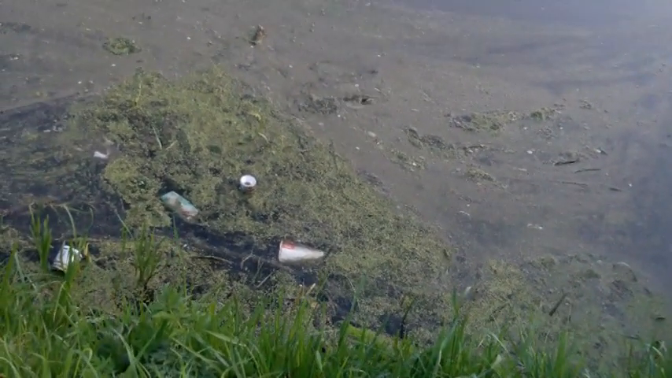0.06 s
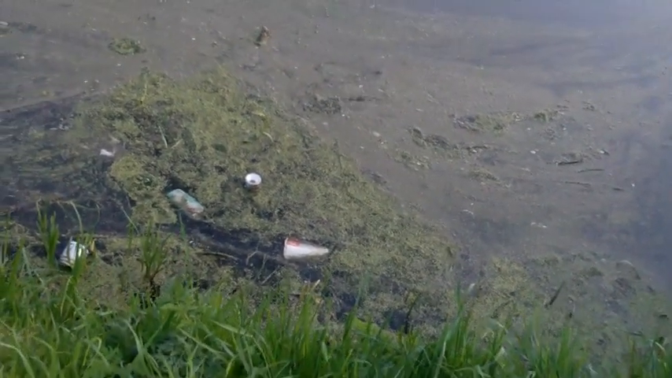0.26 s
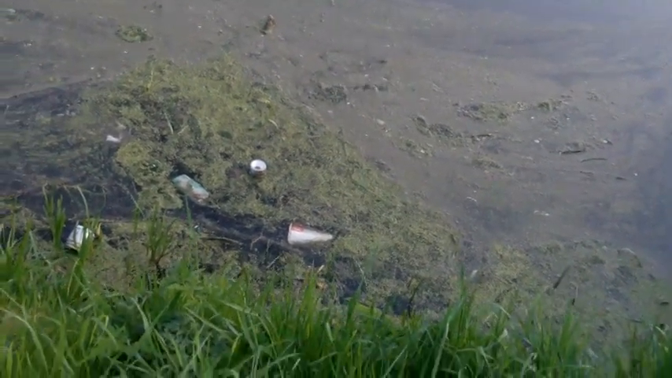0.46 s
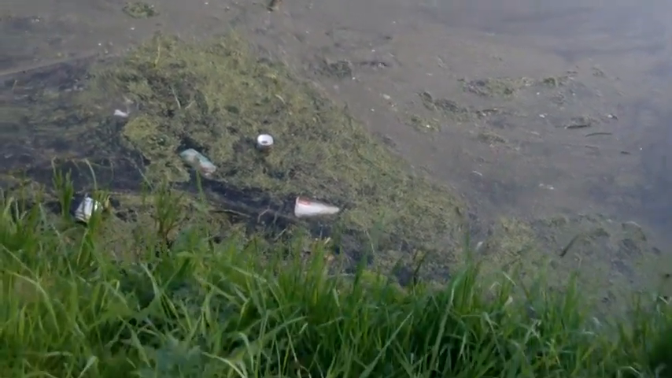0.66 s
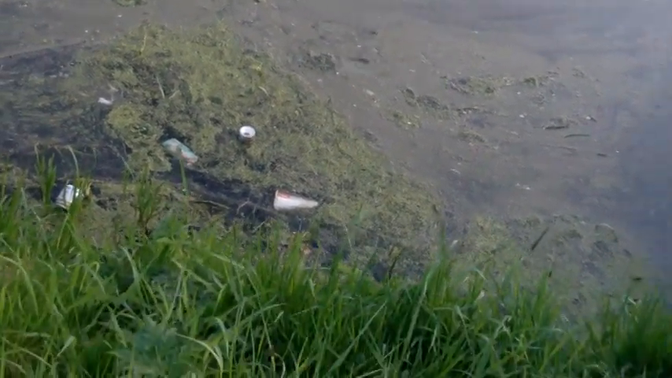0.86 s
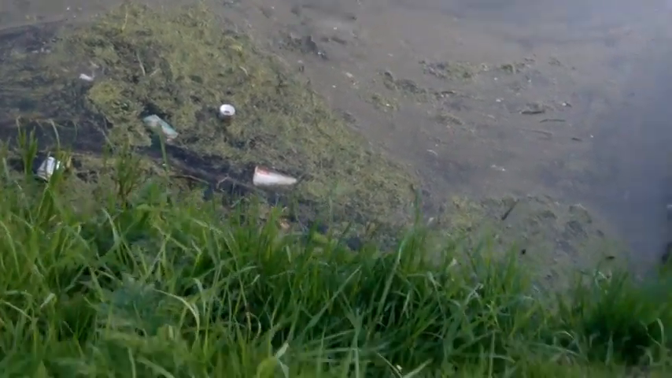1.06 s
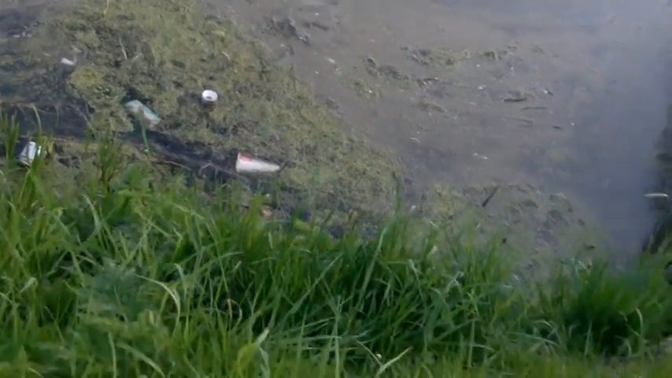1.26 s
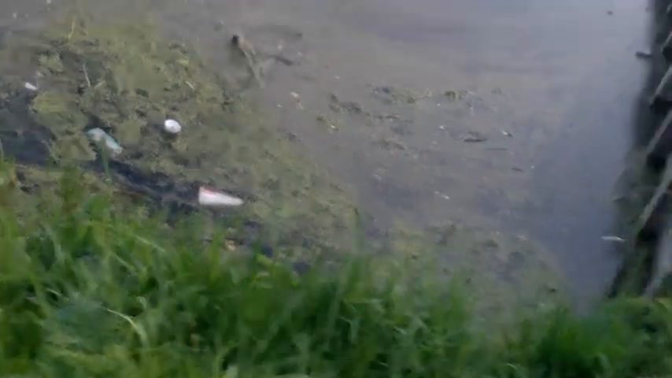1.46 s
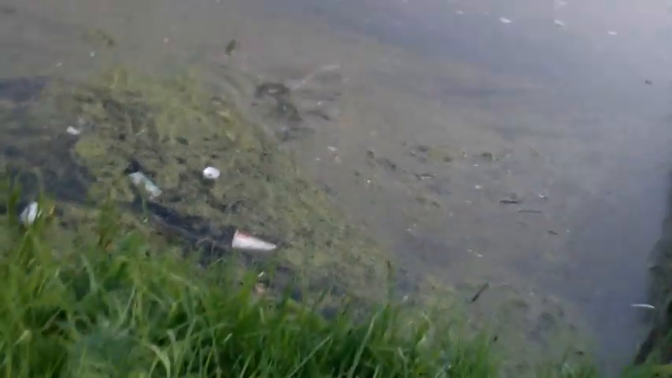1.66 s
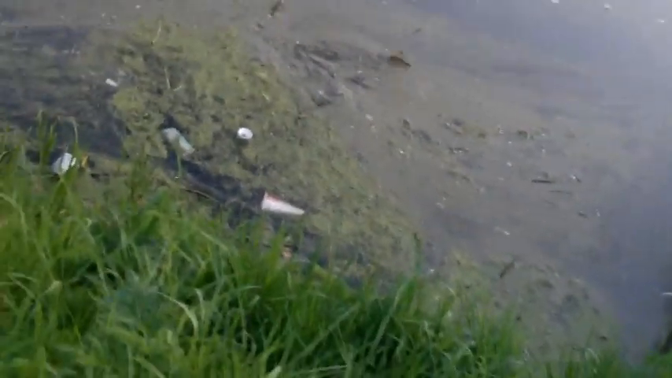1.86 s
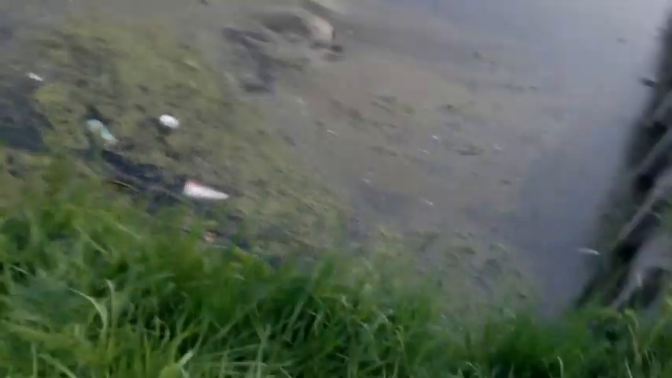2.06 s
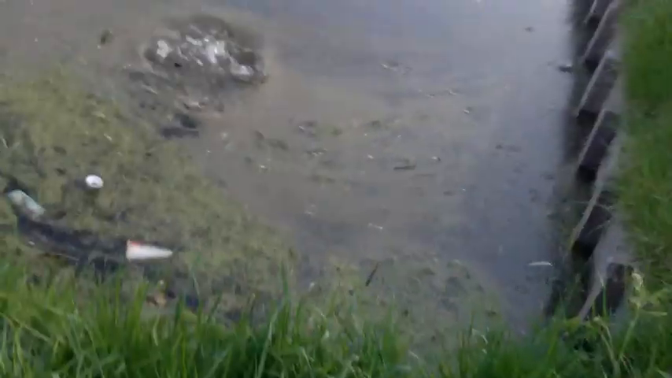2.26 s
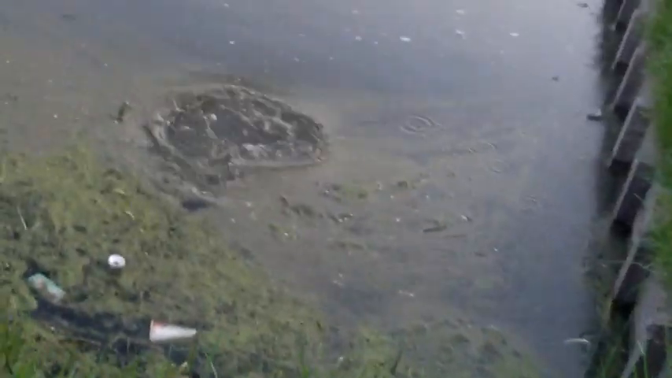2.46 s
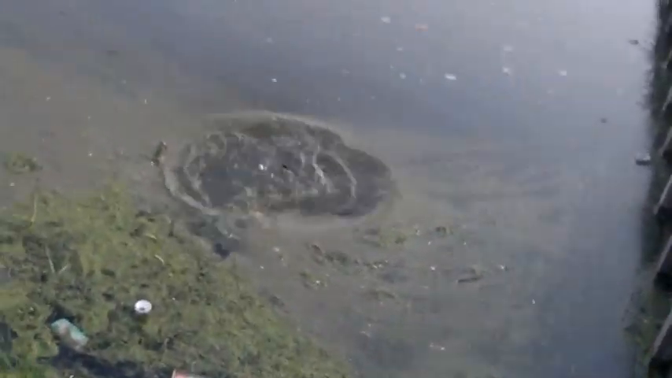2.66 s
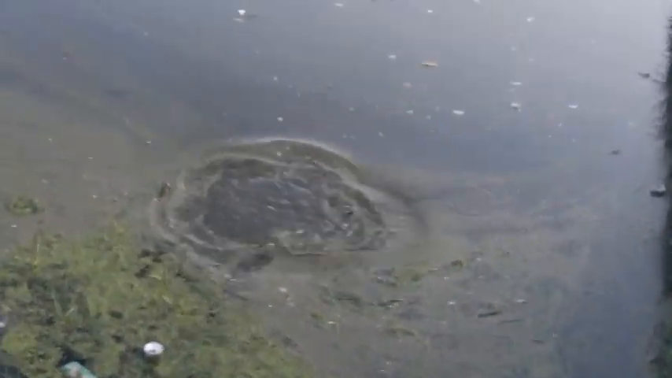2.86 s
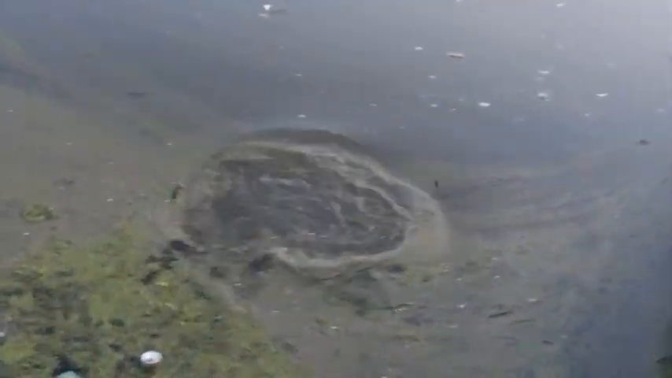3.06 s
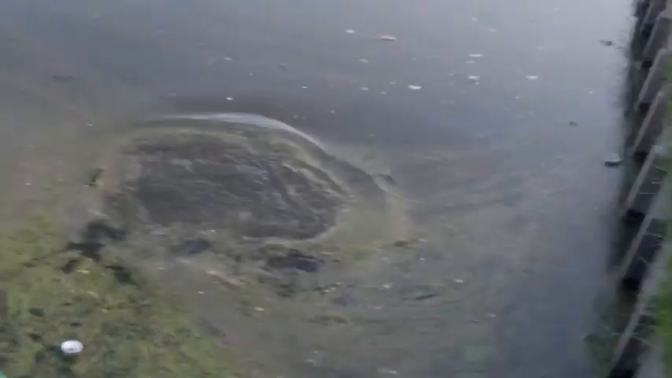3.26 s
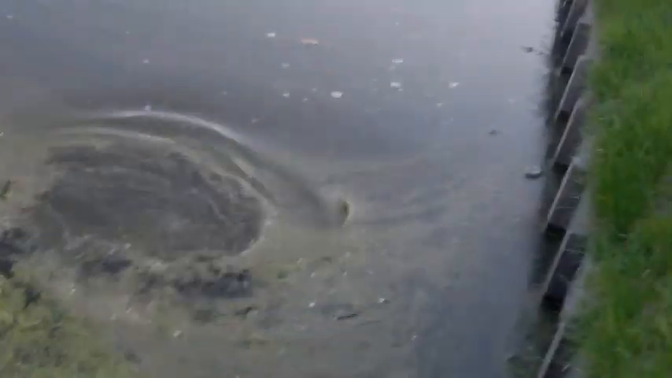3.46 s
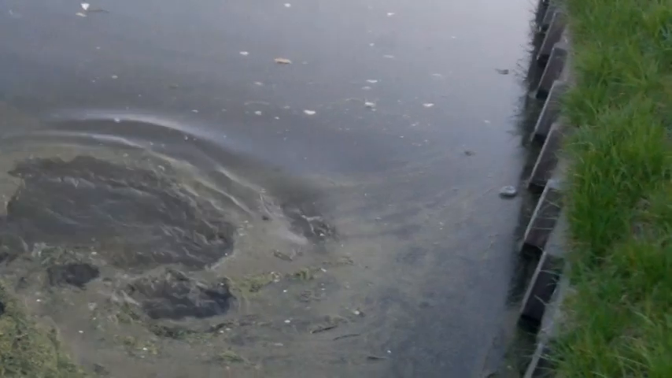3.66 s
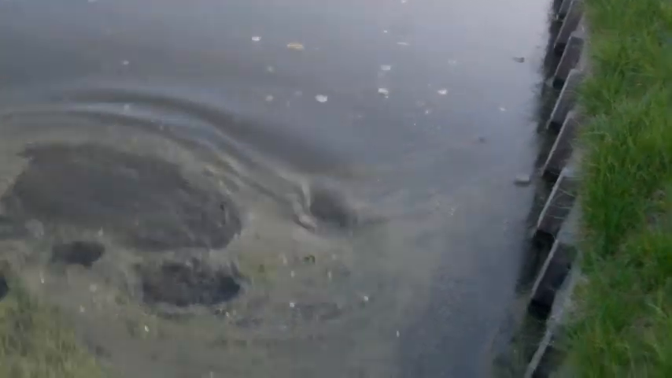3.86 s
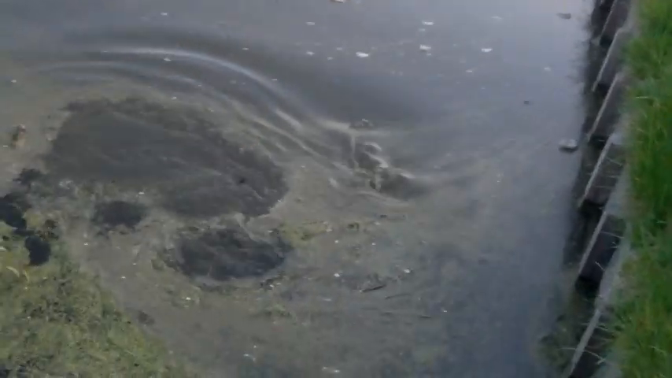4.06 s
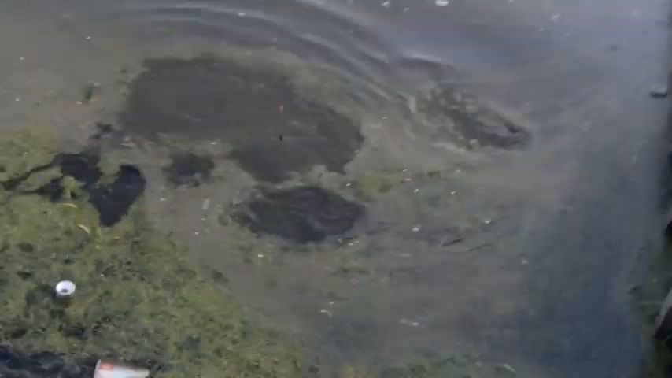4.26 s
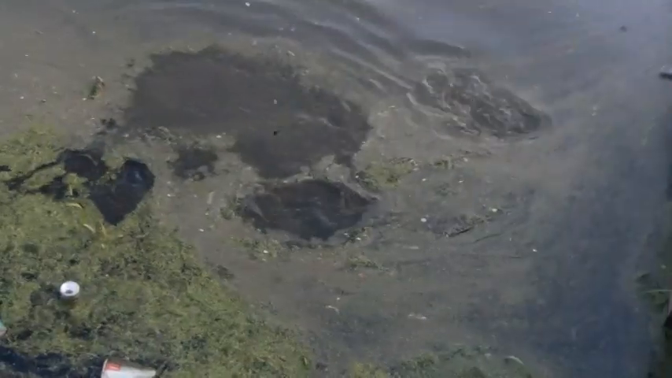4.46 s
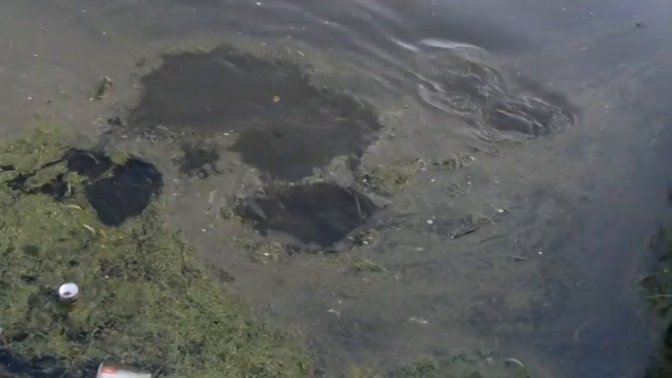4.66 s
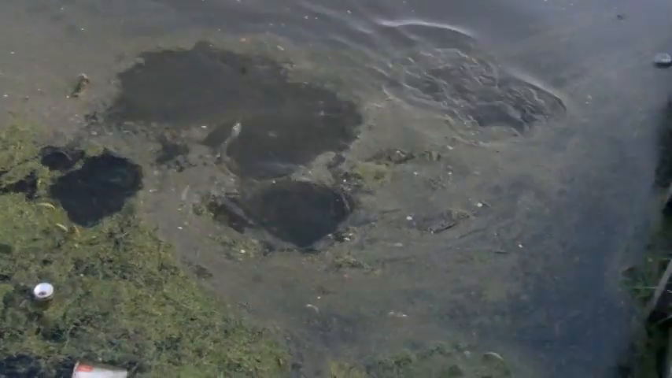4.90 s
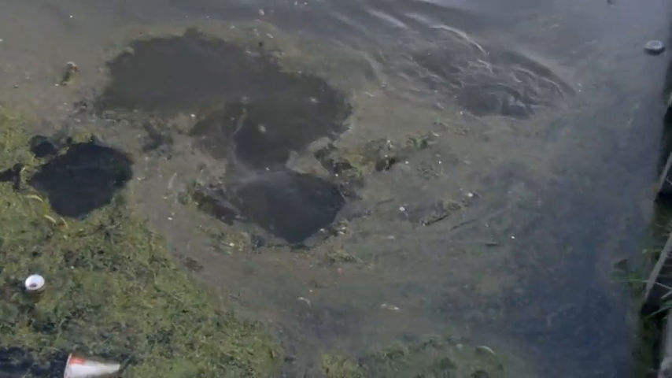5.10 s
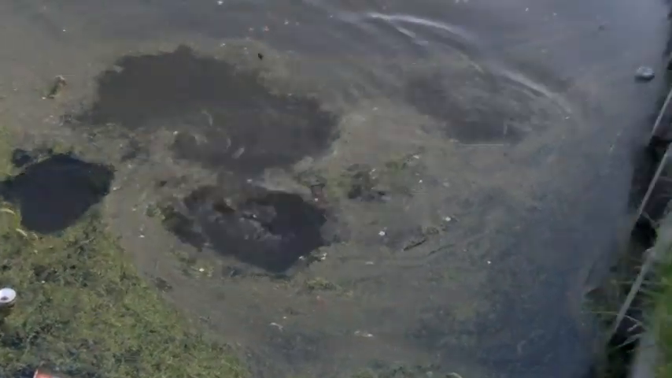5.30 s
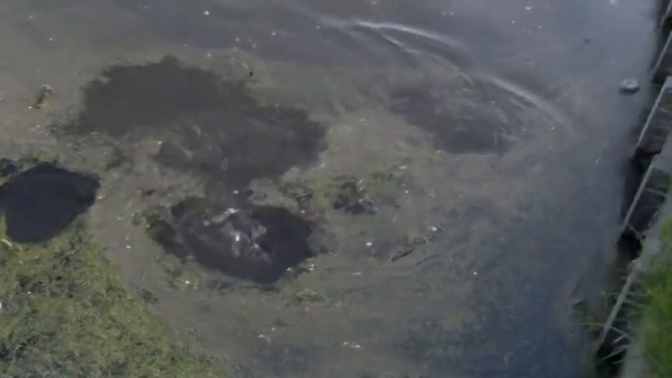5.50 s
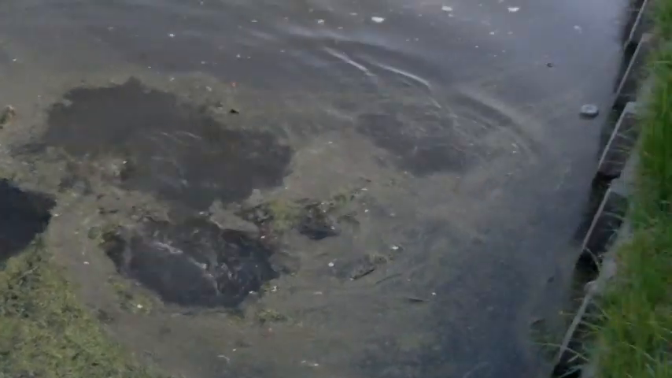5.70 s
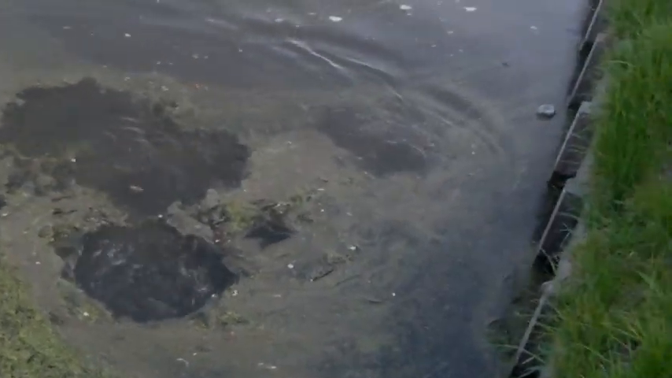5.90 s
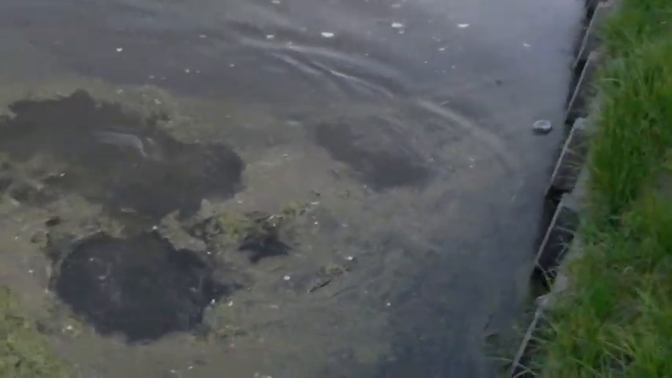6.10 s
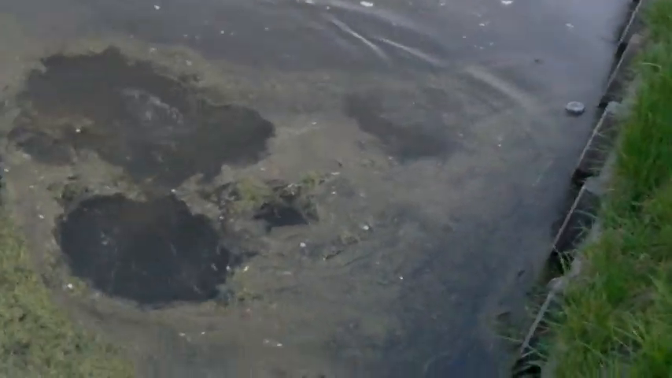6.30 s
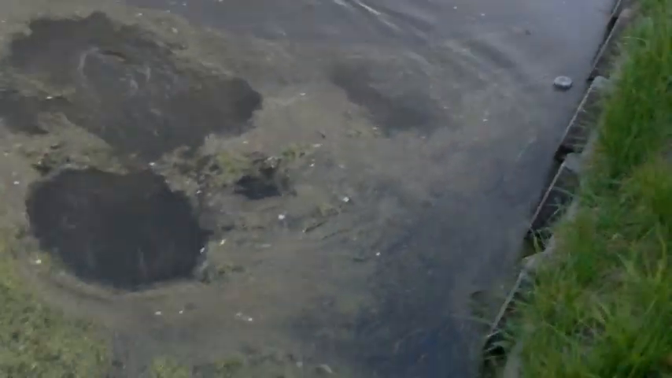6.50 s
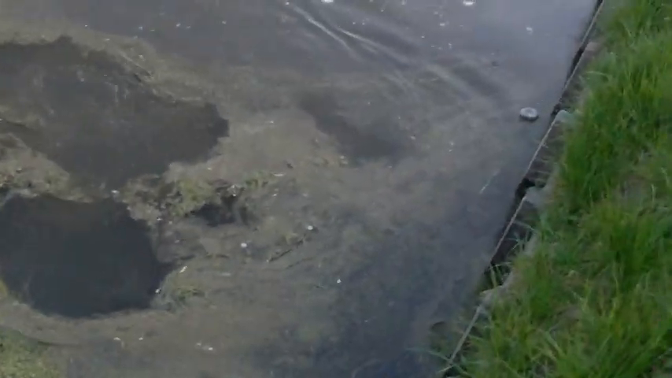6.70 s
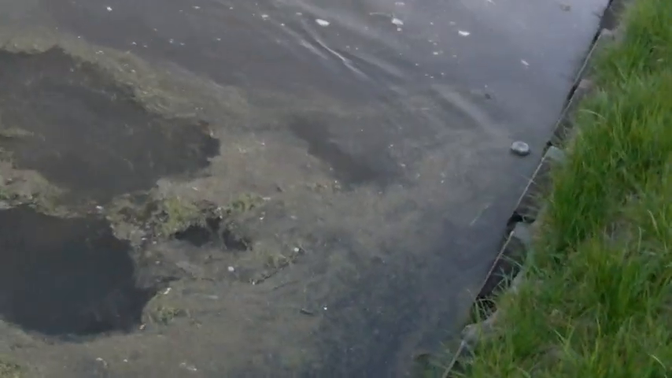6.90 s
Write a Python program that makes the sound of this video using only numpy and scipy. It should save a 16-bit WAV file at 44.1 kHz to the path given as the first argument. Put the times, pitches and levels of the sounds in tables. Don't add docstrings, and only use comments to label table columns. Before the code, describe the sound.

After a quiet start of wind rumble, faint hiss and a few drops, fish thrash a pond surface a few metres away. Rushes of torn water swell and fade irregularly, with sharp drop snaps, fine ticking droplets and small plops. Fingers rub and tap the plastic camera body and soft thuds knock it. A distant bird peeps thinly. A lull near five seconds gives way to more splashing until the end.

```python
import sys
import numpy as np
from scipy import signal
from scipy.fft import rfft, irfft, next_fast_len
from scipy.io import wavfile
from scipy.ndimage import uniform_filter1d

SR = 44100
rng = np.random.default_rng(int(sys.argv[2]) if len(sys.argv) > 2 else 0)


def log_audio(samples):
    frames = np.atleast_2d(samples).T
    limited = np.clip(frames, -1, 1)
    pcm = np.round(limited * 32767).astype(np.int16)
    wavfile.write(sys.argv[1], SR, pcm)


def volts(x):
    e = np.asarray(x, float) / 20
    return 10 ** e


N = 306009
TIME = np.arange(N) / SR
SMALL_HZ = 6600


def evened(x):
    return x / np.sqrt(np.mean(x ** 2) + 1e-20)


def peaked(x):
    return x / (abs(x).max() + 1e-12)


def add(mix, s, sound):
    part = mix[max(round(s * SR), 0):][:len(sound)]
    part += sound[:len(part)]


def read(points, hz):
    f, value = np.transpose(points)
    return np.interp(np.log(hz + 1), np.log(f + 1), value)


def colour(x, points):
    size = next_fast_len(len(x))
    gain = volts(read(points, np.fft.rfftfreq(size, 1 / SR)))
    return irfft(rfft(x, size) * gain, size)[:len(x)]


def band(x, lo_hz, hi_hz):
    return signal.sosfilt(signal.butter(2, [lo_hz, hi_hz], "bandpass", fs=SR, output="sos"), x)


def band_twice(x, lo_hz, hi_hz):
    return band(band(x, lo_hz, hi_hz), lo_hz, hi_hz)


def resonate(x, hz, width_hz):
    turn = np.exp(2j * np.pi * hz * np.arange(len(x)) / SR)
    r = np.exp(-np.pi * width_hz / SR)
    return 2 * (turn * signal.lfilter([1 - r], [1, -r], x / turn)).real


def smooth_twice(x, samples):
    return uniform_filter1d(uniform_filter1d(x, samples), samples)


def swells(rows, rest_db, shape):
    t = TIME[::64]
    power = volts(2 * rest_db)
    for s, db, rise_s, fall_s in rows:
        away = np.maximum((s - t) / rise_s, (t - s) / fall_s)
        power = power + volts(2 * db - 49.7 * away ** shape)
    return np.interp(TIME, t, 10 * np.log10(power))


def patchy(patchy_db, size):
    z = signal.stft(rng.standard_normal(N + 512), nperseg=256, noverlap=192)[2]
    patches = uniform_filter1d(uniform_filter1d(rng.standard_normal(z.shape), size[0], 0), size[1], 1)
    noise = signal.istft(z * volts(patchy_db * evened(patches)), nperseg=256, noverlap=192)[1]
    return evened(noise[:N])


def droplets(per_s, spread_db, lo_hz, top_hz, count):
    out, t = np.zeros(N), np.arange(700) / SR
    for hz in np.geomspace(lo_hz, top_hz, count):
        sizes = volts(spread_db * np.minimum(rng.exponential(1, N), 3))
        hits = sizes * (rng.random(N) < per_s / SR)
        ring = np.sin(2 * np.pi * hz * t * (1 + 40 * t))
        grain = ring * np.exp(-t * hz / 6.0) * (1 - np.exp(-t * hz))
        out += signal.oaconvolve(hits, evened(grain))[:N]
    return evened(out)


def spray():
    # peak in seconds, spray level in dB, build-up in seconds,
    # die-away in seconds, fine mist in dB against the spray.
    thrashes = [(1.4, -46.5, 0.26, 0.35, -9), (1.53, -55.5, 0.13, 0.37, -18), (1.77, -67, 0.043, 0.084, -1),
                (1.85, -50, 0.079, 0.11, -8), (2.12, -49.5, 0.18, .3, 4), (2.24, -44.5, 1, 0.19, -1.5),
                (2.4, -50.5, 0.19, 0.43, -4.5), (2.61, -53, .3, 0.21, -5), (2.76, -57.5, 0.1, 1, -2.5),
                (3.11, -55, 0.057, 0.36, 2), (3.21, -48.5, 0.06, .25, -0.5), (3.295, -45, 0.097, 0.11, 1),
                (3.36, -46.5, .15, 0.1, 3.5), (3.44, -42.5, 0.24, 0.12, -6), (3.75, -53.5, 1, 0.54, -2.5),
                (3.92, -45, 0.23, 0.42, -24), (4.09, -35.5, 0.28, 0.15, -6), (4.27, -54, 0.37, 0.43, -3),
                (4.71, -59.5, 0.54, 1, -3), (5.545, -43.5, 0.33, 0.54, -5.5),
                (5.89, -53.5, 0.18, 0.24, -0.5), (6.14, -54.5, 0.8, 0.21, -5.5),
                (6.367, -41, 0.05, 0.32, -5.5), (6.43, -38.5, 0.17, 0.33, -7), (6.57, -44, 0.19, 0.058, -8),
                (6.61, -52, .05, .04, -9), (6.82, -45.5, 0.084, 0.26, -2.5), (6.93, -44, 0.28, .3, 1)]
    # frequency in Hz, density in dB per Hz.
    spray_colour = [(880, -48), (1500, 1.5), (1670, -14), (1920, -12), (2340, -8), (3150, -2), (3690, -4.5),
                    (5330, -3), (6370, 2.5), (7240, -5.5), (8080, -17), (9010, -14.5), (11100, -15.5),
                    (16000, -29)]
    # lowest Hz, highest Hz.
    spray_bands = [(1800, 4700), (4200, 8500), (8000, 16000)]
    # peak in seconds, level in dB, build-up in seconds, die-away in seconds.
    showers = [
        (1.45, -54, .1, 1.5),
        (2.2, -49, 1.5, 1.6),
        (4.15, -53, 2, 0.74),
        (5.56, -48, 0.15, 0.42),
        (6.1, -62, .8, 3.6),
    ]
    # peak in seconds, level in dB, build-up in seconds, die-away in seconds.
    gurgles = [
        (1.45, -57.5, 0.25, .6),
        (2.1, -62, .4, 0.4),
    ]

    lapping_db, lapping_mist_db = -67.5, -75.5
    level_db = swells([row[:4] for row in thrashes], lapping_db, 1.103)
    mist_rows = [(s, db + fine_db, rise_s, fall_s) for s, db, rise_s, fall_s, fine_db in thrashes]
    mist_db = swells(mist_rows, lapping_mist_db, 1.2)
    pivot_db, heavy_share = -59.5, 0.9
    heavy_db = pivot_db - 2.5 + heavy_share * (level_db - pivot_db)

    torn = patchy(1.8, size=(12, 8)) + 0.12 * droplets(140, 9.9, 2410, 13300, count=8)
    water = colour(torn, spray_colour)
    heavy, middle, mist = (evened(band_twice(water, lo_hz, hi_hz)) for lo_hz, hi_hz in spray_bands)
    rush = volts(heavy_db) * heavy + volts(level_db) * middle + volts(mist_db) * mist
    wander = signal.lfilter([1], [1, -.9985], uniform_filter1d(rng.standard_normal(N), 150))
    rush *= volts(1.1 * evened(wander))
    patter = volts(swells(showers, -88, 0.6)) * droplets(21, 4.5, 2460, 7070, count=8)
    gurgle = volts(swells(gurgles, -85, 2.0)) * droplets(22, 2.9, 375, 1950, count=6)
    return rush + patter + gurgle


def drops():
    # start in seconds, peak in dB, brightness in dB above 8 kHz.
    small_drops = [(1.3625, -11.5, -31), (1.3735, -15.5, -22), (1.379, -21, -22), (1.3982, -25, -26),
                   (1.4632, -18, -15), (1.4828, -23, -18), (1.49, -15.5, -16), (1.553, -14.5, -16),
                   (1.6312, -30, -21), (1.899, -16, -16.5), (1.948, -22, -34.5), (1.956, -32, -24),
                   (1.9967, -14, -18), (2.391, -19.5, -16), (2.428, -25.5, -20), (2.6621, -22, -14),
                   (2.683, -30, -25), (3.2665, -28, -14), (3.279, -13.5, -21), (4.242, -27, -18),
                   (4.28, -16.5, -18), (4.294, -21, -17), (4.447, -32.5, -20), (4.71, -31, -19),
                   (4.9432, -33, -21)]
    # start in seconds, peak in dB, ringing pitch in Hz.
    large_drops = [(0.191, -36, 3260), (.2124, -24.5, 3770), (1.37, -33, 3630), (1.432, -44, 3990),
                   (1.77, -27.5, 3900), (1.8264, -26, 3200), (2.082, -20.5, 2770), (2.246, -24.5, 3030),
                   (2.3103, -21.5, 3550), (2.3642, -31, 3050), (2.5416, -24.5, 4000), (2.566, -28, 4800),
                   (2.604, -20.5, 3360), (2.6185, -26, 3600), (2.724, -36, 3910), (2.75, -27, 4730),
                   (3.455, -24.5, 2700), (3.564, -16.5, 3800), (3.822, -28, 3100), (5.4465, -30, 3330),
                   (5.5248, -22, 3420), (5.538, -23.5, 5200), (5.6256, -24.5, 3760)]
    pitch = SMALL_HZ * (1 + 0.022 * rng.standard_normal(len(small_drops)))
    small = [(s, db, hz, bright_db) for (s, db, bright_db), hz in zip(small_drops, pitch)]
    edge_db, edge_share = -73, 0.12
    large = [(s, db, hz, edge_db - (1 - edge_share) * db) for s, db, hz in large_drops]
    return small + large


def snaps():
    out, t = np.zeros(N), np.arange(600) / SR
    rows = drops()
    chance = rng.standard_normal((len(rows), len(t)))
    for (s, db, hz, bright_db), noise in zip(rows, chance):
        decay = np.exp(-t * hz / 3.9) + .07 * np.exp(-t / 0.0061)
        burst = noise * decay * (1 - np.exp(-t / 0.0001))
        ring = peaked(resonate(resonate(burst, hz, 0.25 * hz), hz, .5 * hz))
        splash = peaked(band(band(burst, 2160, 8200), 2200, 7800))
        body = ring + 0.41 * (hz / SMALL_HZ) ** 2 * splash
        edge = peaked(resonate(resonate(burst, 9100, 2400), 9100, 2400))
        edge = edge + .22 * peaked(band(burst, 10500, 15000))
        snap = peaked(body) + volts(bright_db + 12.0) * edge
        add(out, s, volts(db - 4.0) * snap)
        add(out, s + .00058, volts(db - 20.0) * snap)
        add(out, s + .0016, volts(db - 19.0) * snap)
    return out


def blips():
    # start in seconds, peak in
    # dB, pitch in Hz.
    clean_drops = [(1.2577, -48, 6560), (1.3595, -26, 5300), (1.37, -23, 6860), (1.408, -33, 6700),
                   (1.433, -36, 6800), (1.6498, -48, 6140), (1.674, -38, 6560), (1.8464, -33, 3400),
                   (1.8668, -34, 6900), (1.9756, -36, 3660), (2.0539, -44, 3750), (2.0664, -33, 4500),
                   (2.0735, -27, 6700), (2.1552, -35, 3280), (2.184, -29, 4400), (2.245, -31, 6500),
                   (2.2933, -34, 3760), (2.2975, -36, 3400), (2.3343, -34, 3420), (2.357, -44, 6600),
                   (2.377, -34, 2870), (2.387, -30, 6960), (2.4455, -35, 5300), (2.462, -36, 5200),
                   (2.4859, -39, 6600), (2.504, -41, 2820), (2.515, -36, 6600), (2.5283, -35, 3240),
                   (2.6381, -31, 6850), (2.8057, -43, 3900), (3.077, -38, 6600), (3.1378, -35, 6600),
                   (3.1948, -37, 6900), (3.2038, -40, 3460), (3.606, -35, 6500), (3.6687, -42, 6600),
                   (3.8546, -36, 6560), (3.9217, -41, 6600), (3.951, -33, 4900), (4.685, -42, 6800),
                   (4.6969, -38, 6700), (4.7363, -44, 6800), (4.7616, -36, 6900), (4.7618, -32, 2470),
                   (4.7663, -27, 3900), (4.772, -36, 4200), (4.8735, -39, 7440), (4.8755, -39, 6300),
                   (4.878, -35.5, 2640), (4.993, -39, 6500), (5.574, -38, 2600), (5.66, -31.5, 3870),
                   (5.68, -32, 4300), (6.3387, -45, 6600), (6.3641, -44, 6700), (6.548, -32, 2990),
                   (6.5725, -34, 3470), (6.723, -40, 3450), (6.752, -36, 6000),
                   (1.509, -38, 5050), (2.092, -32, 6250), (2.1175, -32, 6900), (2.268, -34, 2760),
                    (2.4515, -33, 6900), (2.668, -36, 6300), (2.756, -39, 3680), (3.43, -39, 2380),
                    (3.961, -31, 4130), (5.542, -36, 2530), (5.6375, -35, 7100), (5.6465, -37, 2990)]
    # start in seconds, peak in dB.
    finest_drops = [(.19, -40), (0.213, -37), (.225, -43), (1.3678, -30), (1.7704, -34), (1.8786, -39),
                    (2.0662, -36), (2.2792, -34), (2.5684, -39), (2.7422, -42), (2.7502, -36),
                    (3.0669, -45), (3.2311, -38), (3.5633, -43), (3.7655, -44), (3.9764, -36),
                    (3.9953, -36), (4.12, -36), (4.251, -41), (4.2622, -44), (4.358, -47), (4.3879, -43),
                    (4.515, -46), (5.425, -39), (5.5348, -42), (5.574, -41), (5.582, -41), (6.5425, -42),
                    (6.8094, -40)]
    tick_hz = 10550
    out, t = np.zeros(N), np.arange(500) / SR
    front = peaked(band(np.exp(-t / .00004), 4300, 12000))
    for s, db, hz in clean_drops + [(s, db, tick_hz) for s, db in finest_drops]:
        ring = np.sin(2 * np.pi * hz * t * (1 + 6.3 * t))
        ring = ring * np.exp(-t * hz / 3.4) * (1 - np.exp(-t * hz / 0.62))
        add(out, s, volts(db) * (peaked(ring) + volts(2) * hz / SMALL_HZ * front))
    return out


def slaps():
    # start in seconds, rms level in dB, lowest Hz, highest Hz,
    # length in seconds.
    tail_slaps = [(1.355, -40.5, 2000, 11900, 0.035), (1.725, -52.5, 1660, 1960, 0.053),
                  (1.753, -39, 2360, 4700, 0.025), (1.831, -45, 1400, 4530, 0.022),
                  (2.18, -52, 590, 1120, 0.018), (1.905, -36.5, 220, 900, 0.0057),
                  (1.907, -43, 700, 1240, 0.0087), (2.074, -40, 1020, 5100, 0.039),
                  (2.145, -40.5, 850, 2180, 0.031), (2.238, -44.5, 1500, 4600, 0.036),
                  (2.427, -55, 900, 2000, 0.014), (2.471, -50, 1510, 2050, 0.021),
                  (2.606, -56, 1430, 4720, 0.047), (5.478, -51.5, 497, 776, 0.034)]
    out = np.zeros(N)
    chance = rng.standard_normal((len(tail_slaps), 2, 3000))
    for (s, db, lo_hz, hi_hz, length_s), (noise, lumps) in zip(tail_slaps, chance):
        u = np.arange(len(noise)) / (length_s * SR)
        grains = noise * volts(1.3 * evened(smooth_twice(lumps, 60)))
        crackle = evened(band_twice(grains, lo_hz, hi_hz))
        add(out, s, volts(db) * crackle * np.minimum(u / 0.13, 1) * np.exp(-u ** 3))
    return out


def plops():
    # start in seconds, peak in dB, start pitch in Hz, end pitch in Hz,
    # length in seconds.
    bubbles = [(0.397, -44, 807, 1550, 0.04), (.47, -56, 770, 1250, 0.04), (1.784, -47, 3770, 3250, 0.022),
               (1.882, -42, 2170, 3070, 0.017), (2.181, -44, 564, 745, 0.014),
               (2.398, -41.5, 3270, 2620, 0.011), (2.533, -48, 380, 427, 0.015),
               (2.79, -49.5, 2540, 2200, 0.0085), (2.845, -45, 3150, 5030, 0.015),
               (3.406, -39, 3820, 3960, 0.0072), (3.987, -32, 1660, 1730, 0.01),
               (4.288, -39, 3110, 3280, 0.013), (4.515, -58, 6900, 6000, .028),
               (4.59, -55, 6800, 6000, .028), (4.767, -42.5, 2760, 3100, 0.011),
               (4.768, -40, 3760, 3970, 0.006), (4.882, -42.5, 2920, 3220, 0.01)]
    slow_s = 0.018
    out = np.zeros(N)
    chance = rng.standard_normal((len(bubbles), 3000))
    for (s, db, start_hz, end_hz, length_s), noise in zip(bubbles, chance):
        u = np.arange(round(length_s * SR)) / (length_s * SR)
        waver = evened(uniform_filter1d(noise, 90))[:len(u)]
        pitch_hz = start_hz * (end_hz / start_hz) ** u * (1 + 0.056 * waver)
        tone = np.sin(2 * np.pi * np.cumsum(pitch_hz) / SR)
        arch = np.sin(np.pi * u ** np.clip(length_s / slow_s, .4, 1))
        add(out, s, volts(db + 1.3 * waver) * tone * arch)
    return out


def case():
    # frequency in Hz, width in Hz, level in dB.
    modes = [(1130, 66, 2), (1300, 68, 2), (1710, 230, -5), (850, 76, -4.5)]
    # peak in seconds, level in dB, build-up in seconds, die-away in seconds.
    rubs = [(.74, -63, 0.23, 0.27), (1.46, -50.5, 0.5, 0.21), (1.8, -51, 0.87, 0.63),
            (2.16, -45.5, 0.17, 0.68), (2.45, -53.5, 0.62, 0.23), (2.62, -51, 0.12, 0.15),
            (3.02, -61, 0.18, 0.38), (3.31, -48.5, 0.15, 0.12), (3.44, -48.5, 0.092, 0.084),
            (3.7, -72, 0.44, 0.44), (4.05, -49, 0.63, 0.34), (4.4, -58, 0.72, 0.18),
            (4.77, -58, 0.29, 0.38), (5.48, -54, 0.2, 0.99), (6.46, -53, 0.59, 0.37), (6.93, -54, 0.15, .3)]
    # start in seconds, peak in dB, pitch in Hz.
    taps = [(0.721, -44, 1270), (1.2208, -49, 1230), (1.234, -50, 1120), (1.271, -53, 1240),
            (1.288, -43.5, 1267), (1.331, -52, 1130), (1.365, -34, 1260), (1.403, -37.5, 1196),
            (1.4203, -43, 1210), (1.437, -39, 1343), (1.4823, -39, 1130), (1.49, -36, 1300),
            (1.508, -44, 1245), (1.556, -43, 1130), (1.5959, -51, 1250), (1.6417, -36, 1260),
            (1.6732, -43, 1277), (1.7025, -42, 1225), (1.7174, -38.5, 1320), (1.739, -32, 1300),
            (1.749, -41, 1155), (1.8274, -36.5, 1206), (1.845, -40.5, 1130), (1.8623, -40, 1316),
            (1.9083, -32.5, 1312), (1.999, -43, 1320), (2.012, -35, 1290), (2.04, -45, 1130),
            (2.0912, -33.5, 1130), (2.104, -37, 1335), (2.1384, -35, 1206), (2.145, -34, 1050),
            (2.156, -30, 1300), (2.2, -30.5, 1317), (2.246, -35, 1235), (2.264, -29, 1322),
            (2.3004, -35, 1300), (2.327, -42, 1114), (2.3702, -40, 1206), (2.427, -33.5, 1300),
            (2.431, -35.5, 1083), (2.471, -37, 1200), (2.5173, -41, 1305), (2.534, -46, 1280),
            (2.565, -44, 1310), (2.6115, -35.5, 1230), (2.836, -41.5, 1286), (2.853, -42.5, 1350),
            (2.9505, -34, 1300), (3.0114, -48, 1300), (3.115, -45.5, 1264), (3.189, -40.5, 1215),
            (3.217, -37, 1277), (3.623, -38.5, 1273), (3.934, -41, 1267), (4.069, -32.5, 1223),
            (4.4104, -41, 1286), (4.63, -48, 1277), (4.675, -51, 1270), (5.467, -42.5, 1390),
            (5.49, -42, 1210), (5.71, -44, 1360), (6.075, -44, 1100),
            (2.482, -39, 1280), (3.439, -41, 1205), (4.271, -42, 1220), (4.428, -41.5, 1290),
                 (5.238, -44, 1290), (5.656, -46, 1210), (5.874, -44, 1296)]
    slips = volts(3.26 * evened(smooth_twice(rng.standard_normal(N), 400)))
    rub = slips * rng.standard_normal(N)
    buzz = sum(volts(db) * evened(resonate(resonate(rub, hz, 2 * width_hz), hz, width_hz))
               for hz, width_hz, db in modes)
    out = volts(swells(rubs, -80, 1.57) - 3.0) * evened(buzz)

    t = np.arange(3000) / SR
    all_taps = taps
    chance = rng.standard_normal((len(all_taps), len(t)))
    for (s, db, hz), noise in zip(all_taps, chance):
        envelope = np.exp(-t / 0.0083) * (1 - np.exp(-t / 0.00042))
        scrape = (1 + 4.4 * noise) * np.cos(2 * np.pi * hz * t) * envelope
        tap = resonate(scrape, hz, 182) + 0.22 * resonate(scrape, modes[2][0], 120)
        add(out, s - .002, volts(db) * peaked(tap))
    return out


def knocks():
    # start in seconds, peak in dB, pitch of the push in Hz, sharpness in dB at 325-580 Hz.
    body_knocks = [(0.582, -43, 103, -35), (0.711, -36, 123, -42), (1.043, -45, 167, -45),
                   (1.29, -50, 99, -39), (1.467, -32, 128, -33), (1.635, -29.5, 165.5, -42),
                   (1.829, -26, 117, -30), (1.905, -38, 105, -38), (1.999, -35, 123, -27),
                   (2.171, -38, 172, -33), (2.369, -37, 176, -23), (2.417, -29.5, 98, -44),
                   (2.465, -37, 176, -42), (2.56, -35.5, 120, -38), (2.63, -40, 173, -25),
                   (2.899, -42, 116, -33), (2.952, -33.5, 157, -27.5), (3.189, -33, 186, -25),
                   (3.438, -38.5, 129, -34), (3.623, -24.5, 161, -42), (3.809, -36.5, 100, -33),
                   (4.243, -34.5, 126, -28), (4.406, -41, 154, -34), (4.439, -38.5, 171, -34),
                   (4.76, -55, 170, -38), (4.871, -43, 113, -38), (5.67, -47, 161, -38),
                   (5.861, -44.5, 170, -38), (6.074, -40, 130, -30), (6.147, -42, 118, -25),
                   (6.337, -45, 175, -38), (6.602, -42, 172.5, -33)]
    # frequency in Hz, time to fall 60 dB in seconds.
    body_ring = (174.5, 0.17)
    body_hz, body_t60_s = body_ring
    out, t = np.zeros(N), np.arange(SR // 5) / SR
    ring = np.sin(2 * np.pi * body_hz * t) * volts(-60 * t / body_t60_s) * (1 - np.exp(-t / 0.011))
    tick = peaked(band(np.exp(-t / 0.0031), 325, 580))
    for s, db, hz, sharp_db in body_knocks:
        push = np.sin(2 * np.pi * hz * t) * np.exp(-t * hz / 1.75)
        add(out, s - .001, volts(db) * (peaked(push + 0.8 * ring) + volts(sharp_db + 20) * tick))
    return out


def rumble():
    # peak in seconds, rumble level in dB, build-up in seconds.
    gusts = [(.05, -37, 0.37), (.5, -35.5, 0.16), (.77, -36, 0.21), (1.28, -28, 0.31), (1.48, -23, 0.088),
             (1.671, -23.5, 0.13), (1.849, -22, 0.13), (2.04, -21.5, 0.13), (2.15, -25, 0.13),
             (2.38, -26, 0.37), (2.58, -23, 0.095), (2.75, -30, 0.28), (2.9, -32, 1), (3.21, -26.5, 0.3),
             (3.54, -34, 0.57), (3.74, -39.5, 0.77), (4.18, -33, 0.2), (4.92, -41, 0.42), (5.2, -39, 0.73),
             (5.89, -31, 0.21), (6.322, -34, 0.79), (6.9, -36, 0.45)]
    # peak in seconds, level in dB, build-up in seconds, die-away in seconds.
    shakes = [
        (1.65, -50.5, 0.32, 0.91),
        (2.5, -49, 0.9, 0.47),
        (4.45, -55.5, 0.93, 0.44),
    ]
    # frequency in Hz, density in dB per Hz.
    rumble_colour = [(14, -4.5), (25, -8), (33, -5), (41, -2.5), (52, -10.5), (64, -22), (80, -44),
                     (130, -130)]
    # frequency in Hz, density in dB per Hz.
    upper_colour = [(45, -31), (70, 0.5), (120, -7.5), (178, -9.5), (215, -23), (400, -23), (800, -30.5),
                    (1100, -34.5), (1800, -130)]
    breeze_db, gust_tail = -39, 1.35
    low_db = swells([(s, db, rise_s, gust_tail * rise_s) for s, db, rise_s in gusts], breeze_db, 1.12)
    shake = volts(low_db - 23) + volts(swells(shakes, -60, 1.76))
    low = evened(colour(rng.standard_normal(N), rumble_colour))
    low /= np.sqrt(uniform_filter1d(low ** 2, 9000) + .15)
    lumps = volts(2.9 * evened(smooth_twice(rng.standard_normal(N), 900)))
    upper = evened(colour(lumps * rng.standard_normal(N), upper_colour))
    return volts(low_db) * low + shake * upper


def bird():
    # peak in seconds, level in dB, build-up in seconds, die-away in seconds.
    whistles = [
        (1.48, -51.5, 0.03, 0.12),
        (1.56, -57.5, .15, .12),
        (2.005, -46, 0.016, 0.018),
        (3.3, -50, 0.03, 0.044),
    ]
    bird_hz = 5950
    return volts(swells(whistles, -120, 2.3)) * np.sqrt(2) * np.sin(2 * np.pi * bird_hz * TIME)


def electronics():
    # frequency in Hz, density in dB per Hz.
    hiss_colour = [(120, -57), (200, -2), (394, -8.5), (806, -7.5), (950, -10), (1250, -6.5), (1590, -12.5),
                   (3370, -15.5), (7540, -17.5), (7970, -17), (15100, -19.5), (16000, -14)]
    # frequency in Hz, density in dB per Hz.
    side_colour = [(59, -36), (100, -19), (189, -10), (277, -3), (373, -3), (406, -4.5), (3540, -7),
                   (9210, -6), (16000, -5.5)]
    # frequency in Hz, rms level in dB.
    whine = [(7881, -74), (14718, -86), (15644, -83), (15703, -80)]
    mid = volts(-53.5) * evened(colour(rng.standard_normal(N), hiss_colour))
    mid += sum(np.sqrt(2) * volts(db) * np.sin(2 * np.pi * hz * TIME) for hz, db in whine)
    side = volts(-62) * evened(colour(rng.standard_normal(N), side_colour))
    return np.array([mid + side, mid - side])


def scene():
    water = spray() + snaps() + blips() + slaps() + plops()
    handling = case() + knocks()
    return water + handling + rumble() + bird() + electronics()


def band_limit(x):
    return signal.sosfilt(signal.butter(12, 16970, fs=SR, output="sos"), x)


def record(dry):
    low_pass = signal.firwin(1023, 15780, window=("kaiser", 7), fs=SR)
    limited = signal.oaconvolve(dry, low_pass[None], "same")
    return band_limit(limited)


dry = scene()
out = record(dry)
log_audio(out)
```